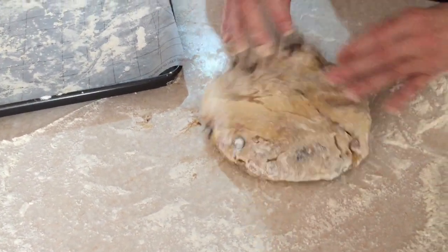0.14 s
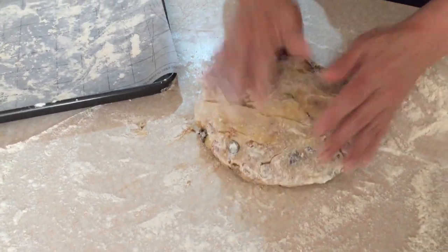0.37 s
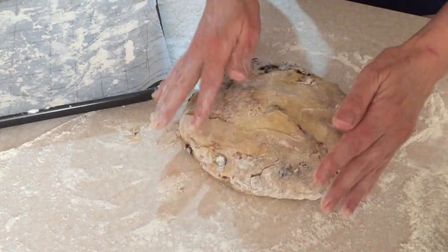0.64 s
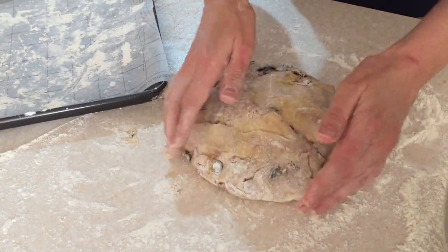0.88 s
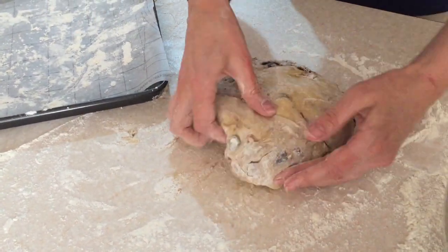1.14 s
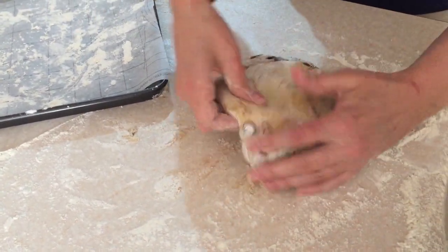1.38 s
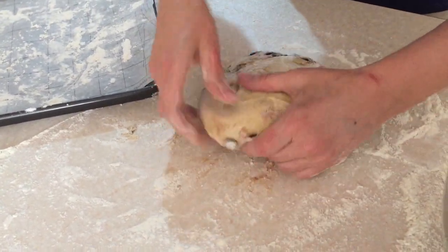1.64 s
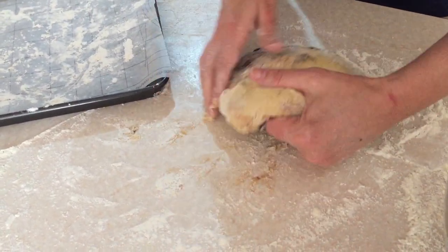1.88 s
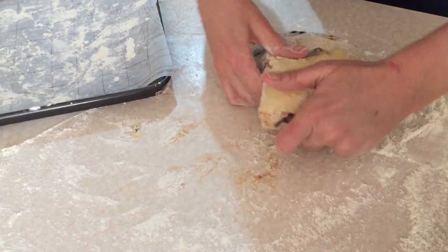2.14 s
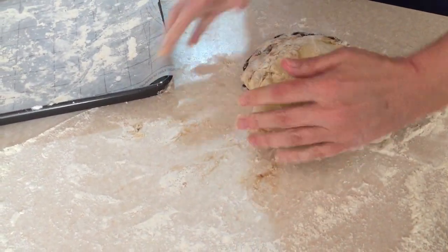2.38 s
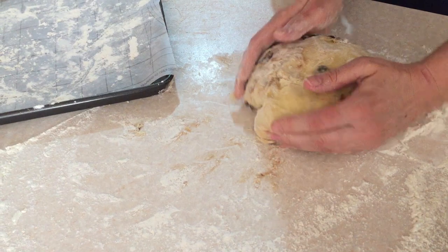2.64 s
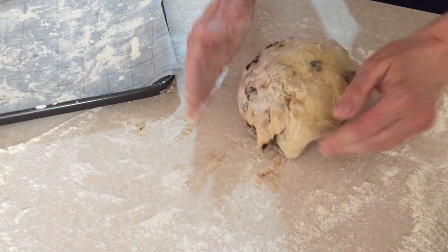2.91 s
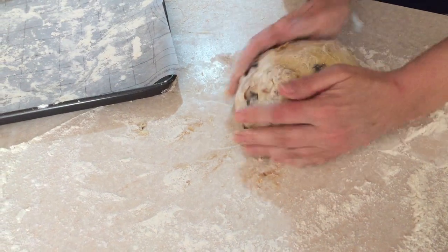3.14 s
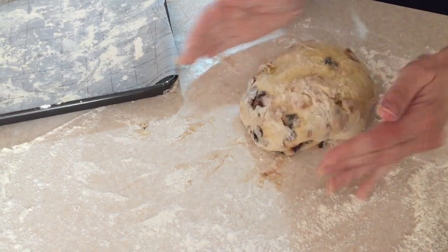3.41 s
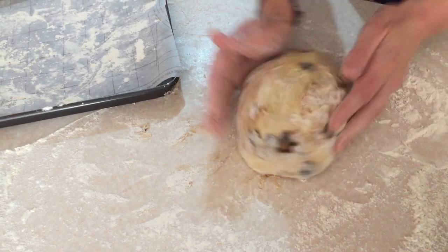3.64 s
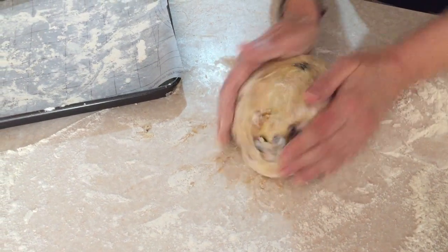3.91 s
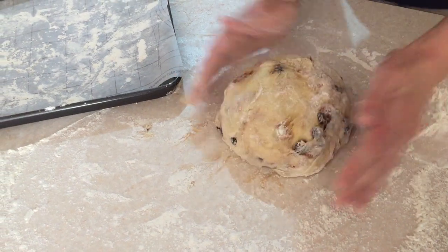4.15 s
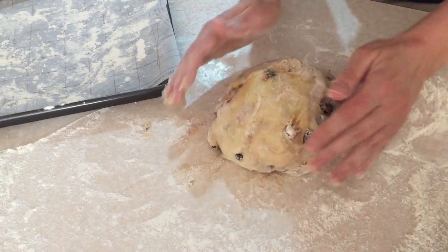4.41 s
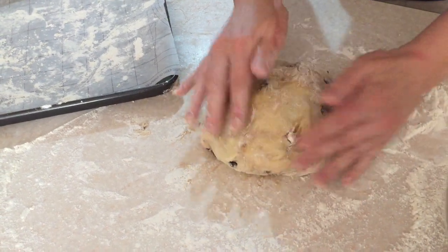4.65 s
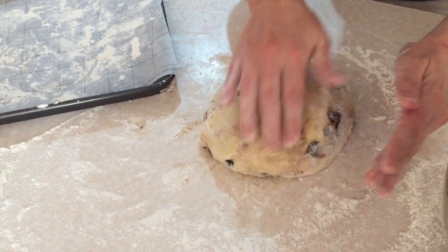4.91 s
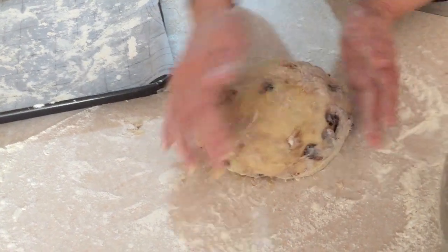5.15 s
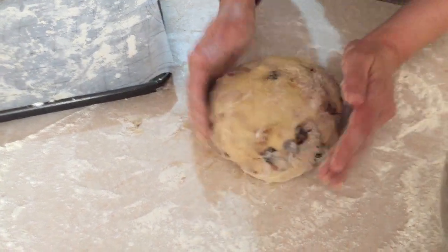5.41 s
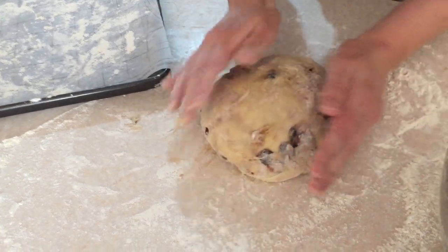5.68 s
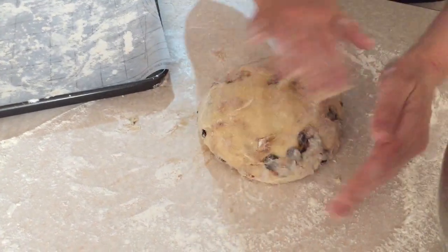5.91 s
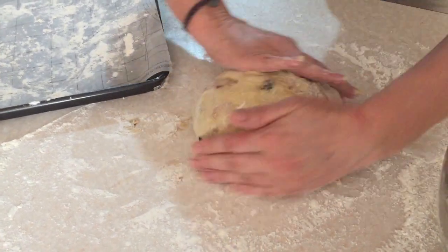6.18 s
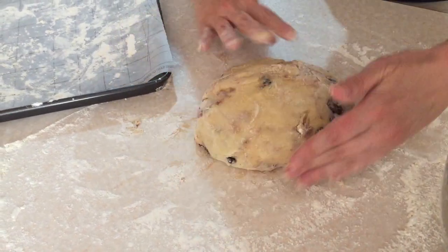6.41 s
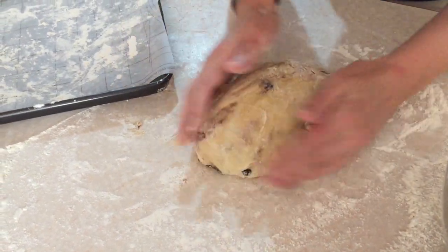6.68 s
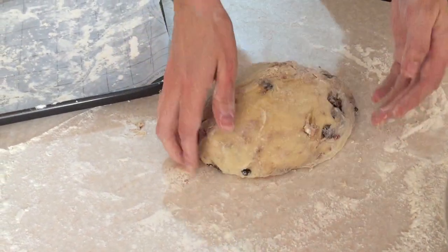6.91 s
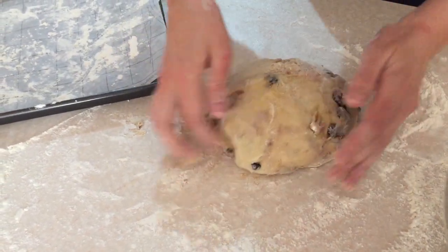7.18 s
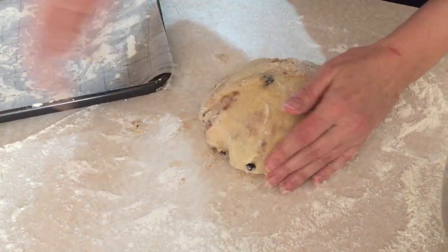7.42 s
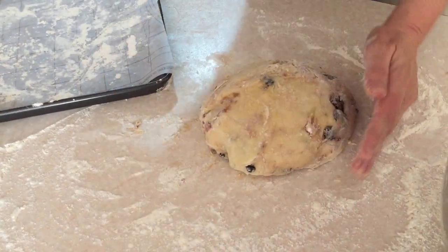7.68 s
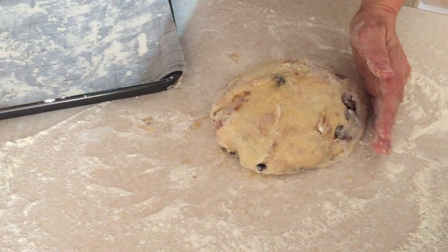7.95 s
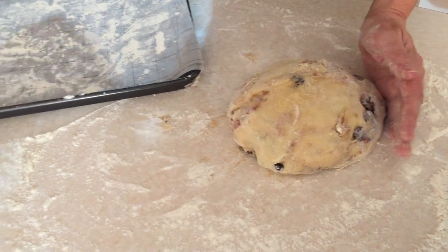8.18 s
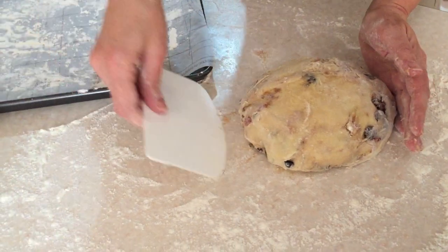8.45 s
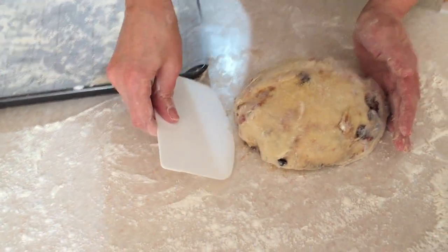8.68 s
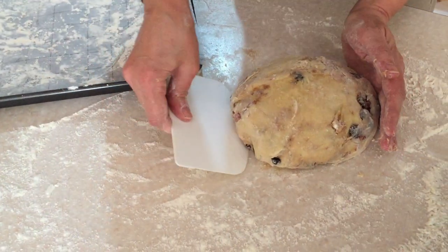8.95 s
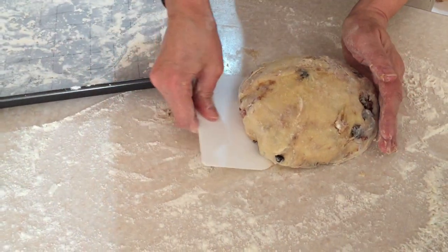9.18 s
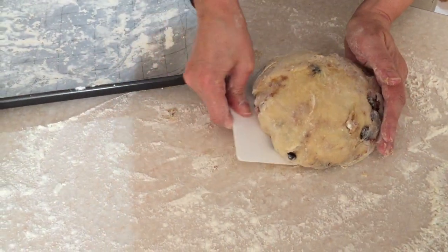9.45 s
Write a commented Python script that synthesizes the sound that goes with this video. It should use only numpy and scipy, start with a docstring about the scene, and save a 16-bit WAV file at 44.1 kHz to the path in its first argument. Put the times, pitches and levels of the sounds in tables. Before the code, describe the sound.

Close to the microphone in a small kitchen, a soft lump of dough lands with a sharp pat and dull thud. Hands press and fold it with faint damp squeaks and floury scuffs, then slap it brightly several times and slide it round. A plastic scraper rattles, taps and scrapes near the end. A refrigerator hums low throughout.

```python
"""A scuff of flour over refrigerator hum, then a sharp pat: hands pat, turn and slide soft dough on a kitchen counter.
Close to the microphone, blows boom as decaying counter modes and slap as bursts of filtered noise.
Flour hisses as flickering grain noise, damp skin squeaks in harmonics, and a plastic scraper is fetched
and set down in ringing taps. A thin tray buzzes, the small room echoes, and behind it all
the refrigerator hums in steady and blurred tones over the rush of the room."""
import sys
import numpy as np
from scipy import signal
from scipy.fft import rfft, irfft, next_fast_len
from scipy.io import wavfile
from scipy.ndimage import uniform_filter1d

SR = 44100
rng = np.random.default_rng(int(sys.argv[2]) if len(sys.argv) > 2 else 0)


def to_linear_factor(level_db):
    """Convert decibel levels (scalar or array-like) to linear amplitude factors."""
    exponent = np.asarray(level_db, float) / 20
    return 10 ** exponent


def dump(signal):
    """Clip the signal to [-1, 1] and save it as 16-bit WAV at the path in sys.argv[1]."""
    limited = np.clip(np.atleast_2d(signal).T, -1, 1)
    pcm = np.round(limited * 32767).astype(np.int16)
    wavfile.write(sys.argv[1], SR, pcm)


N = 422037
T = np.arange(N) / SR

# Skin meeting dough. Each row: time in seconds, just before the burst peaks, pocket level in dB, pocket pitch in Hz,
# treble in dB over the pocket, contact in ms from the palm landing to the peak of the burst.
SLAPS = [(.229, -39, 1860, -30, 1.3), (.231, -37, 955, -45, 2.5), (.244, -47, 1010, -40, 3),
         (.256, -32, 600, -28, 1.13), (.262, -24, 1510, -26, 1.44), (.272, -33, 1930, -30, 3),
         (0.513, -36, 940, -4, 3.3), (.514, -36.5, 3400, -13, 3), (.636, -53, 2400, -6, 10.7),
         (0.806, -44.5, 780, -21, 2.2), (.808, -49, 3140, -13, 2.5), (.822, -51, 1050, -14, 4),
         (1.152, -44, 3450, -1, 9), (1.16, -44, 874, -16, 10.8), (1.335, -51.5, 1490, -7, 16),
         (1.927, -49, 900, -28, 3.1), (2.036, -46.5, 2230, -22, 13), (2.062, -51, 1990, -18, 10.5),
         (3.514, -55, 3000, 0, 1.5), (3.522, -52.5, 3000, -1, 9.3), (3.616, -44.5, 1150, -5, 2.25),
         (3.939, -73, 4000, 11, 3.3), (3.98, -50, 700, -18, 8), (4.215, -62.5, 2730, 9.5, 14),
         (4.298, -50.5, 1410, -15, 2.47), (4.323, -47, 1990, -11, 4), (4.611, -34, 2680, -1, 2),
         (4.62, -41, 955, -20.5, 3.4), (4.869, -36, 2720, 0, 2.9), (4.873, -34, 910, -15.5, 2.8),
         (4.995, -66, 4000, 13.5, 12), (5.087, -36.5, 1470, 0, 2.5), (5.088, -34, 3150, -5.5, 2.5),
         (5.37, -53.5, 1480, -2, 11), (5.648, -40.5, 1220, -13, 4.6), (5.865, -24.5, 3240, 0, 1.74),
         (5.867, -32.5, 1060, -19.5, 2.45), (6.097, -69, 1435, -19, 1.5), (6.786, -57, 2700, -16, 11),
         (7.106, -63, 4000, -8, 1.1), (7.386, -41.5, 2610, -20, 3), (7.861, -38.5, 2780, -2.5, 2.8),
         (7.865, -57, 5450, -12, 8), (7.908, -43, 600, -30, 3.2), (7.953, -35, 640, 0, 1.4),
         (7.963, -36, 600, -17, 3), (7.973, -37, 990, -6, 2.5), (7.978, -44, 1890, 5, 4),
         (7.986, -42.5, 2630, -1, 5)]
LEAD_S = 0.0065  # fingertips land this long before the palm
POCKET_WIDTH, POCKET_ROOM_WIDTH = 0.35, 0.43  # shares of the pitch, at the microphone and in the room
POCKET_ROOM_DB = -10.5
SMACK_LOSS_DB_PER_MS = 0.35
# a bright slap faces the microphone: it sends less into the room than a dull one and its smack is wider
DULL_TREBLE_DB, BRIGHT_TREBLE_DB = -24, -18
DULL_ROOM_DB, BRIGHT_ROOM_DB = -2.5, -9.5
DULL_SMACK_WIDTH_HZ, BRIGHT_SMACK_WIDTH_HZ = 2200, 4400

# Blows felt by the counter. Each row: start in seconds, boom in dB, upper modes in dB over the boom,
# deepest mode in dB over the boom.
THUMPS = [(0.227, -50, 22, -13), (0.257, -22, 11.5, -18), (0.512, -32.5, 4, -6), (0.805, -34.5, -7, -3),
          (1.048, -45, 1, -35), (1.121, -49.5, 11.5, -22), (1.924, -50, 15.5, -22), (2.592, -51, 3, 0),
          (2.823, -61.5, 18, 13), (3.199, -52, -3, -25), (3.613, -31.5, -7.5, -16), (3.937, -40, -11, -22),
          (3.986, -35, 4, -17), (4.294, -27, -10.5, -27), (4.608, -39, 5.5, -6), (4.869, -36, 4.5, -42),
          (5.086, -27.5, -0.5, -24), (5.368, -39.5, -8, -9), (5.632, -40, -10, -13),
          (5.864, -23.5, 1.5, -27), (6.108, -54.5, 6, -20), (6.237, -49.5, -1, -31), (6.703, -49, -19, -29),
          (6.983, -48, -7, -15), (7.019, -61, -5, 17), (7.384, -43.5, -1.5, -25), (7.732, -66, -3, 20),
          (7.859, -38, 5, -2), (7.907, -50, 17, -29), (7.952, -36.5, 10.5, -4), (8.23, -56, -9, 10),
          (8.333, -58, -9, 17.5), (8.655, -52, -1, -17), (8.79, -62, 15, 15)]
# Low counter modes; close neighbours start opposed, so the boom holds, dips and returns.
# Each row: pitch in Hz, relative level in dB, t60 in seconds, starting sign.
BOOM_MODES = [(98.8, -10, 0.52, 1), (121, 3, 0.036, 1), (120.5, 4, 0.16, 1), (129.7, 3, 0.34, -1)]
# Higher counter modes, before the hand stills them. Each row: pitch in Hz, relative level in dB,
# t60 in seconds, starting sign.
UPPER_MODES = [(198.3, -2.5, 1, 1), (229, 3.5, 0.19, -1), (252, 6.5, 0.036, 1), (278, -0.5, 0.058, 1),
               (275, -2.5, 0.032, -1), (326, 4, 0.024, 1), (358, 15.5, 0.027, 1), (385, 8.5, 0.066, -1),
               (411, 4, 0.041, 1), (519, 2.5, 0.07, -1), (600, 1.5, 0.077, 1)]
# Deepest counter mode. Each row: pitch in Hz, relative level in dB, t60 in seconds, starting sign.
DEEP_MODES = [(68.5, 0, 0.071, 1)]
# The cupboard below. Each row: pitch in Hz, relative level in dB, t60 in seconds, starting sign.
CUPBOARD_MODES = [(139.7, 0, .48, -1)]
CUPBOARD_DELAY_S, CUPBOARD_DB = 0.0014, -8  # it answers a moment later
BOOM_DELAY_S = 0.0058  # the push spreads through the dough before the worktop moves
PUSH_MS = 2.19
HAND_DAMPING_PER_S = 10
# the baking tray buzzes along; level in dB under the upper modes
TRAY_HZ, TRAY_WIDTH_HZ, TRAY_T60_S, TRAY_DB = 1740, 800, 0.36, -27

# Strokes over flour. Each row: start in seconds, length in seconds, share of the length until fastest (0-1),
# body level in dB, treble level in dB, both at the fastest point before they flicker.
STROKES = [(-.03, 0.11, 0.5, -70, -71.5), (0.128, 0.11, 0.46, -81, -74), (0.522, 0.1, 0.1, -64, -66),
           (0.606, 0.15, 0.37, -69, -68), (0.797, 0.13, 0.08, -65, -70.5), (1.006, 0.37, 0.28, -69, -74),
           (1.397, 0.73, 0.09, -79, -77), (1.648, 0.12, 0.9, -82, -77), (1.782, 0.18, 0, -77.5, -82),
           (1.942, 0.36, 0.35, -67, -68), (2.207, 0.19, 0.93, -71.5, -69.5),
           (2.55, 0.37, 0.9, -62.5, -66.5), (2.889, 0.19, 0.21, -69.5, -76),
           (3.16, 0.33, 0.54, -62.5, -65.5), (3.508, 0.045, 0.12, -67, -51.5),
           (3.513, 0.15, 0.4, -68, -64.5), (3.582, 0.27, 0.47, -61, -60.5), (3.925, 0.29, 0.37, -61, -61.5),
           (4.267, 0.23, 0.23, -64, -64), (4.623, 0.12, 0.68, -70.5, -65.5), (5.11, 0.08, 1, -78, -78),
           (5.286, 0.28, 0.54, -62.5, -66), (5.61, 0.2, 0.14, -69, -67.5), (5.876, 0.13, 0.4, -67, -73),
           (6.1, 0.19, 0.33, -75.5, -70), (6.212, 0.28, 0.65, -61.5, -61.5),
           (6.615, 0.14, 0.27, -70.5, -65), (6.661, 0.16, 0.7, -69, -70.5), (7.08, 0.12, .6, -82, -79),
           (7.255, 0.031, .5, -90, -79), (7.385, 0.083, 0, -64.5, -70), (7.859, 0.15, 0, -62.5, -62),
           (7.961, 0.14, 0.1, -56.5, -64.5), (8.059, 0.23, 0.19, -64.5, -63.5),
           (8.282, 0.11, 0.36, -75.5, -73), (8.839, 0.079, 0.77, -62.5, -83),
           (9.107, 0.22, 0.5, -65.5, -65), (9.368, 0.24, 0.55, -63, -62)]
# Colour of the flour's body. Each row: frequency in Hz, relative density in dB per Hz.
SLIDE_BODY = [(300, -23), (700, -7.5), (1500, 0), (2500, 0), (4000, -1.5), (6000, -12), (9000, -47)]
# Colour of the flour's treble. Each row: frequency in Hz, relative density in dB per Hz.
SLIDE_TREBLE = [(3000, -33), (6000, -5.5), (8000, -12.5), (10300, -7.5), (12000, -11.5), (15500, -7.5)]
# Bands of the flour hiss that flicker apart. Each entry: centre in Hz.
PATCH_HZ = [700, 1100, 1750, 2800, 4400, 7000, 11000, 15500]
# gain grows with speed to these powers: the treble sets in early and levels off
BODY_POWER, TREBLE_POWER = 2.18, 1.87

# Damp skin on dough. Each row: start in seconds, length in ms, level in dB, slips per second, loudest near Hz.
SQUEAKS = [(1.146, 42, -51, 420, 2030), (1.181, 50, -60, 422, 1960), (1.222, 34, -67, 424, 2080),
           (1.253, 22, -67, 400, 1540), (1.321, 48, -63, 390, 1440), (2.038, 31, -48, 920, 940),
           (2.04, 32, -57, 1045, 1050), (2.073, 32, -57, 930, 930), (2.142, 36, -66, 925, 930),
           (2.19, 40, -69, 950, 950)]
SQUEAK_GLIDE, SQUEAK_JITTER = 0.014, 0.025  # pitch rise over the length and wobble, as shares of the pitch
SQUEAK_FALL_DB = 20  # loss one octave from the loudest
SQUEAK_ROUGH, SQUEAK_ROUGH_HZ = 0.7, 120  # how deeply and how fast each harmonic flutters

# The scraper's edge rattling or tapping on the counter. Each row: start in seconds, level in dB.
KNOCKS = [(7.954, -66), (7.976, -43), (8.097, -50), (8.113, -48), (8.128, -54), (8.143, -65), (8.165, -68),
          (8.666, -50), (8.881, -56), (8.89, -39.5), (8.9, -62)]
# Rings of its plastic. Each row: pitch in Hz, relative level in dB, t60 in seconds, starting sign.
SCRAPER_MODES = [(700, 1, 0.0089, 1), (1150, -10, 0.029, 1), (1450, 8, 0.025, 1), (1720, 3, 0.041, -1),
                 (2320, -5, 0.051, 1), (3000, -11, 0.016, -1), (4300, -10, 0.013, 1)]

# Tail of the room. Each row: centre in Hz, t60 in seconds, relative level in dB.
ECHO = [(478, 0.31, 5.5), (1410, 0.077, -5.5), (3400, 0.22, -7), (9000, 0.16, -15)]

# Steady refrigerator lines. Each row: pitch in Hz, level in dB rms, waver in dB.
HUM = [(146.11, -50, .9), (292.2, -76, 2)]
# Swell of the lower blurred tone. Each row: time in seconds, level in dB rms.
WHINE_SWELL = [ [(0.0, -83), (0.16, -83), (0.37, -76), (1.73, -77), (2.11, -70), (2.64, -87), (3.14, -73),
               (3.3, -82), (5.68, -85), (6.34, -78), (6.45, -71), (6.85, -80), (9.41, -79), (9.57, -83)],
               ][0]
WHINE_HZ, WHINE_WIDTH_HZ = 722., 18.
BLUR_HZ, BLUR_WIDTH_HZ, BLUR_DB = 1500., 90., -82  # the upper, more blurred tone of the fan
# Rush of the quiet room. Each row: frequency in Hz, relative density in dB per Hz.
ROOM_TONE = [(20, -28), (45, -4), (90, -9), (130, -2), (170, -0.5), (200, 0.5), (270, -3.5), (476, -14.5),
             (1130, -22), (1520, -24.5), (2500, -27), (4870, -35.5), (10300, -39), (12000, -39),
             (16000, -44)]
ROOM_TONE_DB = -58

MIC_LOW_HZ, MIC_TOP_HZ = 60, 15850
MIC_DIP_HZ, MIC_DIP_WIDTH_HZ, MIC_DIP_SHARE = 10430, 840, 0.62


def band(x, hz, width, order=1):
    """Band-pass whose edges lie evenly, as ratios, around hz."""
    lo = np.sqrt(hz ** 2 + width ** 2 / 4) - width / 2
    edges = [lo, min(lo + width, .49 * SR)]
    return signal.sosfilt(signal.butter(order, edges, "band", fs=SR, output="sos"), x)


def colour(x, spectrum):
    """Shape a noise by (Hz, dB) points; rms 1."""
    hz, db = np.transpose(spectrum)
    size = next_fast_len(len(x))
    f = np.arange(size // 2 + 1) * SR / size + 1
    gain = to_linear_factor(np.interp(np.log(f), np.log(hz), db))
    y = irfft(rfft(x, size) * gain, size)[:len(x)]
    return y / np.std(y)


def walk(rate):
    """Random levels held 1 / rate s and slewed twice; spread near 1."""
    k = int(SR / rate)
    held = np.repeat(rng.standard_normal(N // k + 1), k)
    return 1.3 * uniform_filter1d(uniform_filter1d(held, k), k)[:N]


def add(out, sound, s):
    """Mix a sound in at time s."""
    i = int(s * SR)
    out[i:i + len(sound)] += sound[:len(out) - i]


def decay(t, t60):
    """Exponential fade that loses 60 dB in t60 seconds."""
    return np.exp(-np.log(1000) * t / t60)


def ring(modes, spread_db, chance):
    """Decaying sines of a struck body, peak 1; where the blow lands changes each mode's share."""
    t = T[:SR // 2]
    y = 0
    for (hz, db, t60, sign), c in zip(modes, chance):
        y = y + np.sign(sign) * to_linear_factor(db + spread_db * c) * decay(t, t60) * np.sin(2 * np.pi * hz * t)
    return y / np.abs(y).max()


def slaps():
    """Fingertips brush first, then squeezed air bursts out: a broad smack, the pocket under the hand, a spit of treble."""
    near, far, t = np.zeros(N), np.zeros(N), T[:SR // 8]
    click = 1. * (np.arange(len(t)) == int(LEAD_S * SR))
    treble_ends = [DULL_TREBLE_DB, BRIGHT_TREBLE_DB]
    for s, db, hz, treble_db, ms in SLAPS:
        contact = ms / 1000
        x = np.clip(t - LEAD_S, 0, 1) / contact
        palm = (x * np.exp(1 - x)) ** 3
        fingertips = to_linear_factor(-17.5) * (t / LEAD_S * np.exp(1 - t / LEAD_S)) ** 2
        burst = palm + fingertips
        width_hz = np.interp(treble_db, treble_ends, [DULL_SMACK_WIDTH_HZ, BRIGHT_SMACK_WIDTH_HZ])
        room_db = np.interp(treble_db, treble_ends, [DULL_ROOM_DB, BRIGHT_ROOM_DB])

        def pocket(v):
            return band(v, hz, POCKET_WIDTH * hz, order=2)

        def pocket_in_room(v):
            return band(v, hz, POCKET_ROOM_WIDTH * hz)

        def smack(v):
            return band(v, 1230.0, width_hz, order=2)

        def treble(v):
            return band(v, 5720.0, 850.0) + 0.3 * band(v, 7200.0, 9300.0, order=2)

        # slow contact: more pocket, less smack
        smack_db = max(-0.5 - SMACK_LOSS_DB_PER_MS * ms, -16.)
        # the pocket faces the microphone, so the room hears less of it
        layers = [(pocket, pocket_in_room, 0, to_linear_factor(POCKET_ROOM_DB)),
                  (smack, smack, smack_db, 1),
                  (treble, treble, treble_db, 1)]
        start = s - LEAD_S - .6 * contact
        sent = 0
        for shape, room_shape, gain_db, share in layers:
            part = shape(rng.standard_normal(len(t)) * burst)
            part = to_linear_factor(db + gain_db) * part / np.abs(part).max()
            add(near, part, start)
            # averaged over all directions the colour is smooth
            even = room_shape(click)
            sent = sent + share * even * np.std(part) / np.std(even)
        # each spot has its own echo pattern
        add(far, echo(to_linear_factor(room_db) * sent), start + contact)
    return near, far


def counter():
    """A soft half-sine push rings the worktop. Returns the boom and the upper modes."""
    boom, upper = np.zeros((2, N))
    push = np.sin(np.linspace(0, np.pi, int(PUSH_MS * SR / 1000)))
    push = push / push.sum()
    top, deep, cupboard = (ring(modes, 0., np.zeros(len(modes)))
                           for modes in (BOOM_MODES, DEEP_MODES, CUPBOARD_MODES))
    add(top, to_linear_factor(CUPBOARD_DB) * cupboard, CUPBOARD_DELAY_S)
    # the hand stays on the dough and stills the upper modes
    damping = np.exp(-HAND_DAMPING_PER_S * T[:SR // 2])
    for s, db, upper_db, deep_db in THUMPS:
        low = top + to_linear_factor(deep_db) * deep
        add(boom, to_linear_factor(db) * signal.fftconvolve(low, push), s + BOOM_DELAY_S)
        high = ring(UPPER_MODES, 4.0, rng.standard_normal(len(UPPER_MODES))) * damping
        add(upper, to_linear_factor(db + upper_db) * signal.fftconvolve(high, push), s)
    return boom, upper


def tray():
    """Each blow shakes the thin tray nearby into a gritty, fading buzz of band-passed noise."""
    shake, t = np.zeros(N), T[:SR // 2]
    fade = decay(t, TRAY_T60_S) * np.clip(t / 0.0097, 0, 1)
    for s, db, upper_db, _ in THUMPS:
        add(shake, to_linear_factor(db + upper_db + TRAY_DB) * fade, s)
    buzz = band(rng.standard_normal(N), TRAY_HZ, TRAY_WIDTH_HZ, order=2) * to_linear_factor(5.9 * walk(45))
    return shake * buzz / np.std(buzz)


def slide():
    """Dense flour grains of uneven size under moving skin and dough; each stroke speeds up, then slows to rest."""
    body, treble = np.zeros((2, N))
    for s, length, share, db, treble_db in STROKES:
        fastest = s + np.clip(share, .05, .95) * length
        during = slice(max(int(s * SR), 0), int((s + length) * SR))
        angle = np.interp(T[during], [s, fastest, s + length], [0, np.pi / 2, np.pi])
        speed = np.sin(angle).clip(0)
        body[during] += to_linear_factor(db) * speed ** BODY_POWER
        treble[during] += to_linear_factor(treble_db) * speed ** TREBLE_POWER
    jerk = to_linear_factor(0.91 * walk(35))  # damp skin grips and lets go
    out = 0
    for gain, spectrum, patches in ((body, SLIDE_BODY, PATCH_HZ[:5]), (treble, SLIDE_TREBLE, PATCH_HZ[3:])):
        sizes_db = 2.4 * rng.exponential(size=N) + 1.55 * walk(150)
        grains = colour(rng.standard_normal(N) * to_linear_factor(sizes_db), spectrum)
        # the flour lies in patches: each band scuffs louder and softer on its own
        for hz in patches:
            flicker = to_linear_factor(1.75 * walk(30) + 2.43 * walk(90))
            out = out + gain * jerk * flicker * band(grains, hz, 0.47 * hz)
    return out


def squeaks():
    """Uneven stick-slip: a short stack of harmonics that glides up a little, each one fluttering on its own."""
    out, wobble = np.zeros(N), SQUEAK_JITTER * walk(90)
    lowpass = signal.butter(2, SQUEAK_ROUGH_HZ, fs=SR, output="sos")
    slow = signal.sosfilt(lowpass, rng.standard_normal((2, N)))
    # complex, so that both level and phase flutter
    flutter = 1 + SQUEAK_ROUGH * (slow[0] + 1j * slow[1]) / np.std(slow)
    for s, ms, db, hz, loudest_hz in SQUEAKS:
        x = np.linspace(0, 1, int(ms * SR / 1000))
        pitch = hz * (1 + SQUEAK_GLIDE * (x - .5) + wobble[int(s * SR):][:len(x)])
        phase = 2 * np.pi * np.cumsum(pitch) / SR
        stack = 0
        for k in range(1, 10):
            level = to_linear_factor(-SQUEAK_FALL_DB * np.log2(k * hz / loudest_hz) ** 2)
            own_flutter = flutter[int((s + k / 2) * SR):][:len(x)]  # a stretch apart for each harmonic
            stack = stack + level * np.imag(np.exp(1j * k * phase) * own_flutter)
        add(out, to_linear_factor(db) * stack * np.sin(np.pi * x ** 0.68), s)
    return out


def scraper():
    """Gritty taps, short fading noises, ring the modes of a thin plastic blade."""
    out, t = np.zeros(N), T[:SR // 16]
    for s, db in KNOCKS:
        chance = rng.standard_normal(len(t))
        tap = chance * np.exp(-t / 0.0067)
        knock = signal.fftconvolve(ring(SCRAPER_MODES, 2.5, chance), tap)
        knock = knock[:len(t)] / np.abs(knock).max()
        grit = band(tap, 1800.0, 3300.)
        grit = grit / np.abs(grit).max()
        add(out, to_linear_factor(db) * (knock + to_linear_factor(-16) * grit), s)
    return out


def echo(x):
    """Diffuse tail of a small hard room: noise bands, each fading at its own rate."""
    t = T[:SR // 3]
    tail = 0
    for hz, t60, db in ECHO:
        part = band(rng.standard_normal(len(t)), hz, hz) * decay(t, t60) * np.clip(t / 0.003, 0, 1)
        tail = tail + to_linear_factor(db) * part / np.sqrt(np.sum(part ** 2) * SR / (2 * hz))
    return to_linear_factor(8.5) * signal.fftconvolve(x, tail)[:N]


def refrigerator():
    """Compressor lines that waver a little, and two blurred tones of narrow noise."""
    out = 0
    for hz, db, waver_db in HUM:
        out = out + np.sqrt(2) * to_linear_factor(db + waver_db * walk(8)) * np.sin(2 * np.pi * hz * T)
    swell_db = np.interp(T, *np.transpose(WHINE_SWELL))
    for hz, width, db in ((WHINE_HZ, WHINE_WIDTH_HZ, swell_db), (BLUR_HZ, BLUR_WIDTH_HZ, BLUR_DB)):
        tone = band(rng.standard_normal(N), hz, width)
        out = out + to_linear_factor(db + 3 * walk(5)) * tone / np.std(tone)
    return out


def room_tone():
    """The steady rush of the room, coloured noise whose low rumble wanders band by band."""
    rush = colour(rng.standard_normal(N), ROOM_TONE)
    for hz in (65., 220., 400.):
        rush = rush + (to_linear_factor(3.3 * walk(9)) - 1) * band(rush, hz, 0.3 * hz)
    return to_linear_factor(ROOM_TONE_DB + 0.35 * walk(6.3)) * rush


def scene():
    """Everything near the microphone, its echo and the kitchen behind."""
    near, far = slaps()
    boom, upper = counter()
    flour, skin, blade = slide(), squeaks(), scraper()
    room = far + echo(to_linear_factor(-11.0) * upper + to_linear_factor(-10.0) * (flour + blade) + to_linear_factor(-10.5) * skin)
    close = near + boom + upper + tray() + flour + skin + blade
    return (close + room + refrigerator() + room_tone())[None]


def roll_off(x):
    """The treble ends steeply here."""
    return signal.sosfilt(signal.butter(12, 16430, fs=SR, output="sos"), x)


def record(dry):
    """The microphone loses the deepest bass, part of a narrow band of treble and the very top."""
    heard = signal.sosfilt(signal.butter(3, MIC_LOW_HZ, "high", fs=SR, output="sos"), dry)
    heard = heard - MIC_DIP_SHARE * band(heard, MIC_DIP_HZ, MIC_DIP_WIDTH_HZ)
    heard = signal.sosfilt(signal.ellip(8, .2, 30, MIC_TOP_HZ, fs=SR, output="sos"), heard)
    return roll_off(heard)


dry = scene()
out = record(dry)
dump(out)
```